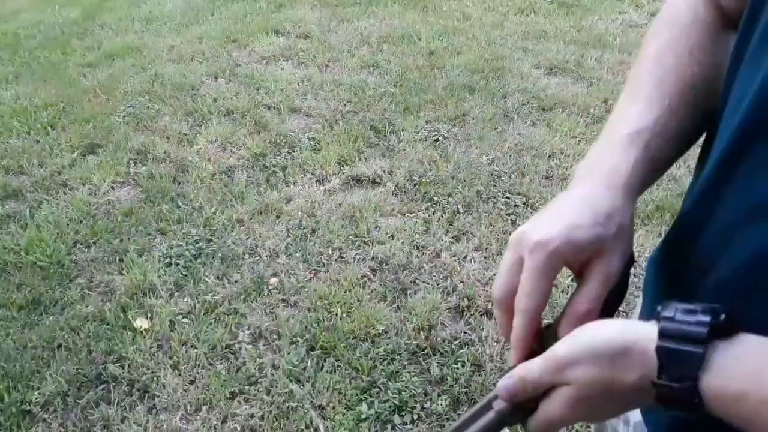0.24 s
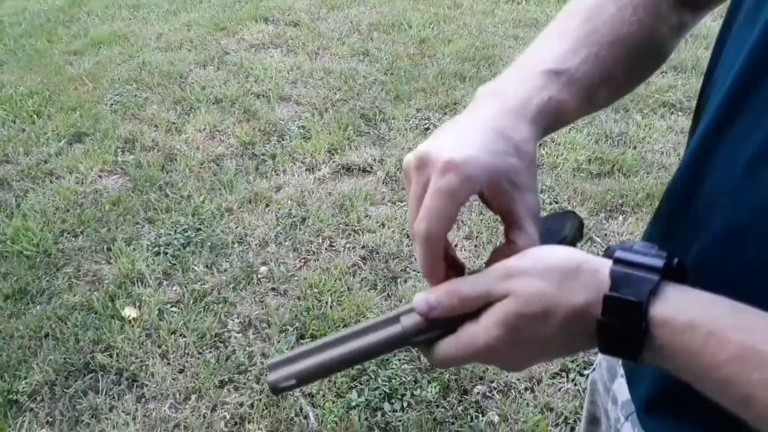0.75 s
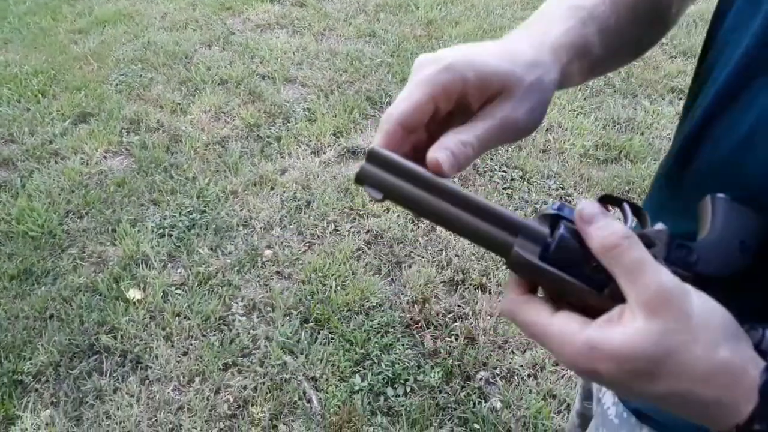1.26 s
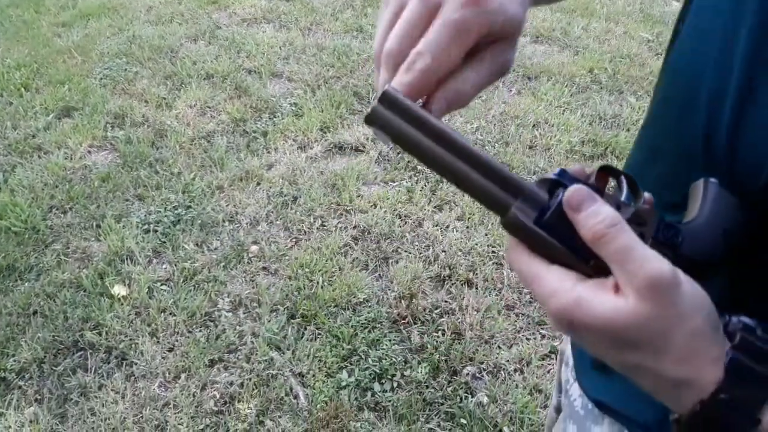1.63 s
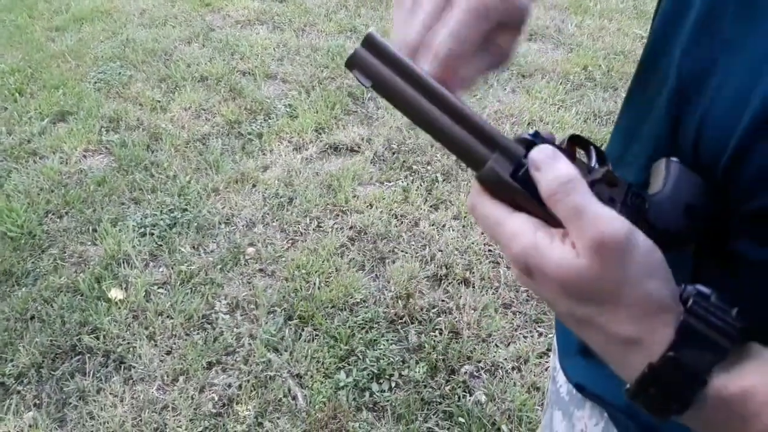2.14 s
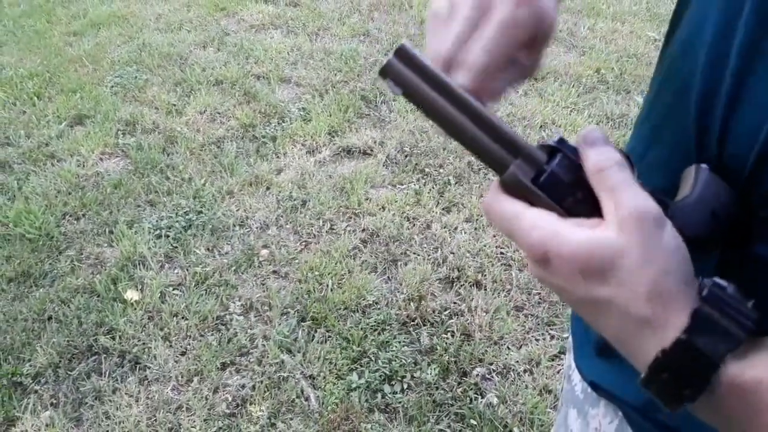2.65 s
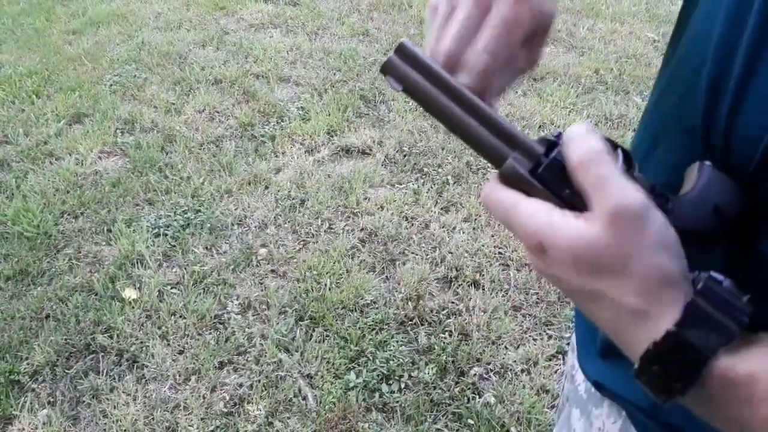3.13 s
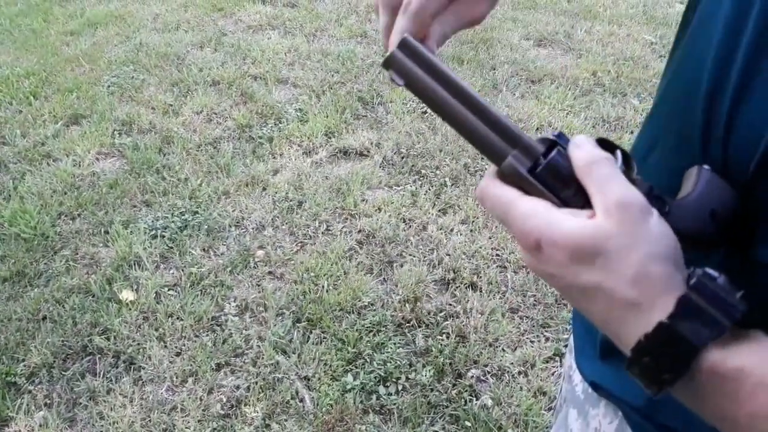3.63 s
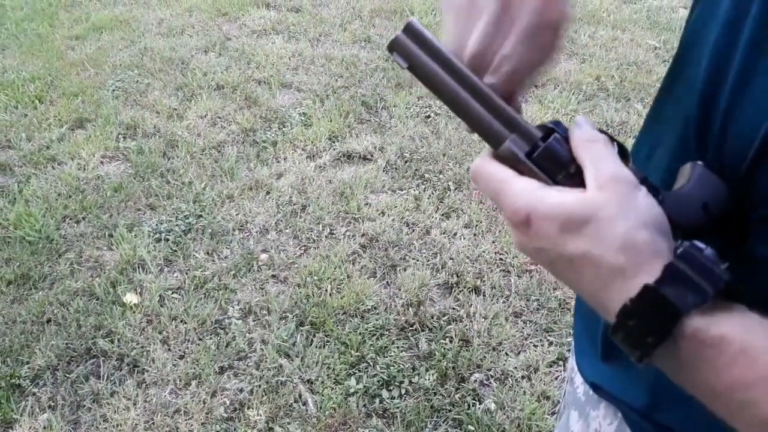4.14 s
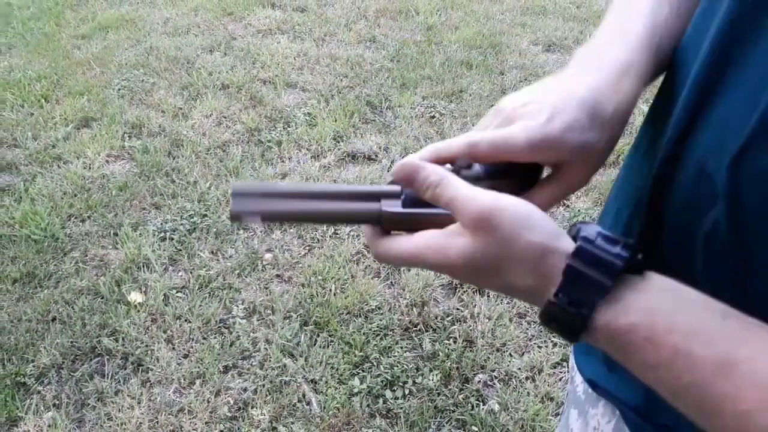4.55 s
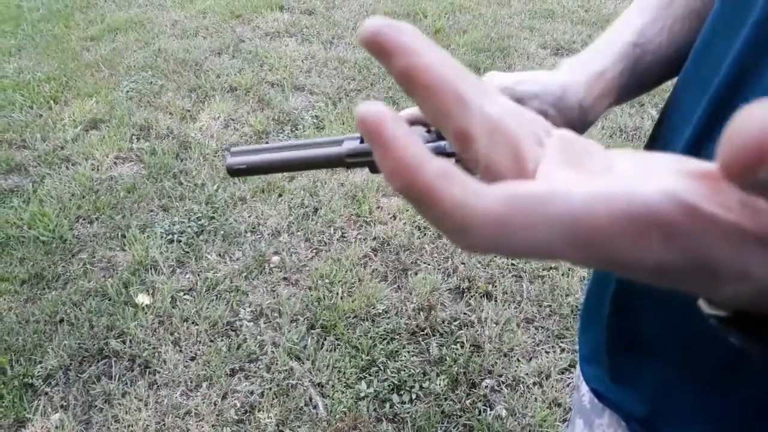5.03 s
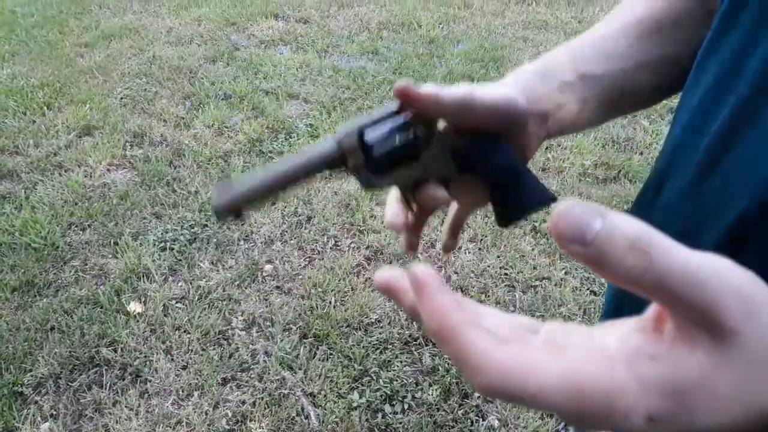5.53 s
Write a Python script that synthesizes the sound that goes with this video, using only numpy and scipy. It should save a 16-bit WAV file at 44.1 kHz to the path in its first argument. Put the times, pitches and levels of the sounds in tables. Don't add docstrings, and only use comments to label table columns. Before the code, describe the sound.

A hard metal clack, then repeated scrape-and-snap strokes of a revolver's ejector rod, ending in another loud clack on a quiet lawn.

```python
import sys
import numpy as np
from scipy import signal
from scipy.fft import rfft, irfft
from scipy.io import wavfile

SR = 44100
rng = np.random.default_rng(int(sys.argv[2]) if len(sys.argv) > 2 else 0)


def unload_wav(signal):
    wavfile.write(
        sys.argv[1],
        SR,
        np.round(np.clip(np.atleast_2d(signal).T, -1, 1) * 32767).astype(np.int16),
    )


def to_linear_factor(level_db):
    exponent = np.asarray(level_db, float) / 20
    return 10 ** exponent


N = 254935


def unit(x):
    return x / np.sqrt(np.mean(x ** 2) + 1e-20)


def at_hz(points, hz):
    points = np.array(points)
    return np.interp(np.log(np.maximum(hz, 1)), np.log(points[:, 0]), points[:, 1])


def column(rows, index):
    rows = np.array(rows)
    return np.interp(np.arange(N) / SR, rows[:, 0], rows[:, index])


def envelope(tables, index, fade_s):
    out = np.zeros(N)
    for rows in map(np.array, tables):
        start_s, end_s = rows[0, 0], rows[-1, 0]
        first = max(int((start_s - fade_s) * SR), 0)
        last = min(int((end_s + fade_s) * SR), N)
        t = np.arange(first, last) / SR
        edge = np.clip(np.minimum(t - start_s, end_s - t) / fade_s + .5, 0, 1)
        out[first:last] += edge * to_linear_factor(np.interp(t, rows[:, 0], rows[:, index]))
    return out


def drift(rate_hz):
    r = np.exp(-2 * np.pi * rate_hz / SR)
    slow = signal.lfilter([1], [1, -2 * r, r * r], rng.standard_normal(N + SR))
    return unit(slow[SR:])


def resonate(x, hz, width_hz):
    r = np.exp(-np.pi * width_hz / SR)
    zeros = np.array([1, 0, -1]) * (1 - r * r) / 2
    poles = [1, -2 * r * np.cos(2 * np.pi * hz / SR), r * r]
    return signal.lfilter(zeros, poles, x)


def body(x, modes, strengths_db=0):
    gains = to_linear_factor(np.array(modes)[:, 2] + strengths_db)
    out = 0
    for k, ((hz, width_hz, _), gain) in enumerate(zip(modes, gains)):
        out = out + (-1) ** k * gain * resonate(x, hz, width_hz)
    return out


def noise_pair(size, alike=.5):
    shared, left, right = rng.standard_normal((3, size))
    return np.sqrt(alike) * shared + np.sqrt(1 - alike) * np.array([left, right])


def coloured(spectrum, alike):
    gain = to_linear_factor(at_hz(spectrum, np.fft.rfftfreq(N, 1 / SR)))
    return unit(irfft(rfft(noise_pair(N, alike)) * gain, N))


def echoes(x, t60, start_s):
    t = np.arange(int(.6 * SR)) / SR
    tail = rng.standard_normal((2, len(t))) * to_linear_factor(-60 * t / t60) * (t > start_s)
    return signal.fftconvolve(x, tail / np.sqrt(np.sum(tail ** 2) / 2), axes=1)[:, :N]


def scatter(x, t60):
    out, r = 0, to_linear_factor(-120 / (t60 * SR))
    for band in ([600, 1800], [1800, 3200], [3200, 5500], [5500, 9000], [9000, 16000]):
        sos = signal.butter(2, band, "band", fs=SR, output="sos")
        energy = signal.lfilter([1 - r], [1, -r], signal.sosfilt(sos, x) ** 2)
        fresh = unit(signal.sosfilt(sos, rng.standard_normal((2, N))))
        out = out + np.sqrt(energy) * fresh
    return out


# t/s, leaf level/dB, breeze level/dB
AIR = [(0.0, -57.5, -74), (2.09, -59, -78), (3.99, -56.5, -74), (5.39, -64, -85), (5.78, -66.5, -78.5)]
# f/Hz, level per Hz/dB
LEAF_SPECTRUM = [(300, 5.5), (700, 14.5), (1300, 9), (2200, 11.5), (4000, 6), (7500, 1.5), (8500, -7),
                 (12000, -8), (15000, -13)]


def leaves():
    return to_linear_factor(column(AIR, index=1) - 10.5) * coloured(LEAF_SPECTRUM, alike=0.066)


# f/Hz, level per Hz/dB
BREEZE_SPECTRUM = [(25, -27.5), (50, -5), (80, -0.5), (130, -2.5), (250, -13), (500, -11), (900, -38)]
# t/s, level/dB
PUFF = [
    (.6, -72),
    (.625, -63),
    (.68, -63),
    (.72, -69),
    (.82, -71),
]


def breeze():
    gusts = to_linear_factor(np.array([2.5 * drift(9) - 1.5, 2.5 * drift(9) + 1.5]))
    turbulence = resonate(resonate(rng.standard_normal((2, N)), 150, 260), 200, 900)
    puff = envelope([PUFF], index=1, fade_s=0.016) * unit(turbulence) * to_linear_factor(2.0)
    steady = to_linear_factor(column(AIR, index=2) + 3.5) * gusts * coloured(BREEZE_SPECTRUM, alike=0.67)
    return steady + puff * np.sqrt(gusts)


STRAY_TICKS = [.234, .5766, 1.153, 1.386, 1.515, 5.2757, 5.582]
MISSED_TICKS = [1, 5, 13, 14, 15, 16, 17, 45, 47, 51, 54]


def motor():
    first_s, period_s = .0752, .10238
    beat = np.delete(np.arange(first_s, N / SR, period_s), MISSED_TICKS)
    times = np.r_[beat, STRAY_TICKS]
    tick = np.zeros(N)
    tick[(times * SR).astype(int)] = to_linear_factor(-35 - 1.2 * times + rng.normal(0, 1.5, len(times)))
    return resonate(resonate(tick + 1e-18, 6900, 1500), 6900, 1500) * to_linear_factor([[0], [-8]])


# t/s, level/dB
RUB = [
    (.106, -63),
    (.13, -46.5),
    (.15, -47.5),
    (.19, -53.5),
    (.226, -56.5),
]
# f/Hz, bandwidth/Hz, level/dB
CASE = [(510, 230, -6), (976, 122, 5), (1440, 250, -5), (2270, 400, -14), (3300, 700, -21),
        (4900, 700, -19)]


def finger_rub():
    grit = rng.standard_normal((2, N)) * to_linear_factor(1.9 * drift(120))
    rubbed = signal.sosfilt(signal.butter(4, 5500, fs=SR, output="sos"), body(grit, CASE))
    return envelope([RUB], index=1, fade_s=0.0069) * unit(rubbed) * to_linear_factor([[-1], [3]])


# t/s, tap level/dB, thud
# level/dB, thud f/Hz
BUMPS = [(0.1416, -19.5, -37.5, 70.6), (.805, -57, -50, 95), (4.348, -58, -34, 120),
         (5.112, -54, -35.5, 87), (2.083, -80, -48, 480), (2.596, -80, -48, 480), (3.896, -80, -46, 480),
         (4.82, -80, -52, 80), (5.025, -80, -52, 75), (5.186, -80, -46, 600), (5.558, -74, -59.5, 70),
         (5.597, -78, -53, 68)]


def bumps():
    out, t = np.zeros((2, N)), np.arange(4096) / SR
    for s, tap_db, thud_db, hz in BUMPS:
        tap = np.sin(2 * np.pi * 1700 * t) * np.minimum(t / .00015, 1)
        tap = tap * to_linear_factor(tap_db - 60 * t / 0.002) * to_linear_factor([[-10], [0]])
        sweep = hz * (t + hz / 15000 * (1 - np.exp(-t / .003)))
        thud = np.sin(2 * np.pi * sweep + [[0], [1.6]]) * np.minimum(t / 0.0022, 1)
        thud = thud * to_linear_factor(thud_db - 60 * t * hz / 5.2) * to_linear_factor([[-5], [2.5]])
        at = round(s * SR)
        out[:, at:at + len(t)] += tap + thud
    return out


TOUCHES = [(.8729, -43.5, 4000, 17), (1.1958, -38, 6500, 12), (1.549, -37, 3260, -10),
           (1.921, -42, 3460, 4), (4.34, -40, 4050, 18), (4.6703, -42, 3160, -13), (4.7395, -41, 3060, 2),
           (4.832, -50, 3200, -8), (4.845, -38, 3250, -12), (4.9048, -47, 3300, -6), (4.948, -55, 3300, -6),
           (4.963, -54, 3200, -6), (5.011, -47, 2600, -7), (5.0149, -46, 2610, -4), (4.754, -40, 3130, -6),
           (4.762, -38, 4600, 0), (4.984, -52, 1000, -8), (.222, -46, 2300, -10), (5.054, -56, 3300, -6),
           (5.078, -53, 3100, -6), (5.546, -47, 4600, -6), (5.5988, -55, 3980, -5), (5.61, -47, 1030, -5)]
TOUCH_COLOUR = (-16, -31, -35, .003, 4)
GATE = [
    (.9396, -6, 2750, -4, -27),
    (1.2502, -38, 3380, 14.5, -32),
    (1.723, -21.5, 3310, 0, -17),
    (4.7703, -21, 4260, -10, -20),
    (4.7875, -30, 3090, -12, -17),
    (4.79, -32, 4200, -8, -17),
    (5.1116, -7, 4300, 4, -22),
]
GATE_COLOUR = (0, -14, -12.5, .009, 1.5)
PAWL = [(1.2385, -28, 3800, 8), (4.168, -24, 1020, -8), (1.2415, -25, 4750, 6), (2.0673, -8, 2280, 6.5),
        (2.5789, -9, 2200, 4), (5.112, -10, 11400, -4), (3.0485, -14.5, 2350, 4), (3.472, -16, 2270, -4),
        (3.4716, -22, 4800, 4), (3.8759, -10, 2300, -1), (5.4264, -51.5, 2270, -4), (5.534, -47, 2224, -4),
        (5.5758, -45, 2210, 0), (5.6625, -48, 1950, 0)]
PAWL_COLOUR = (-33, -24, -16, .015, -4.5)
TICKS = [(1.6636, -49, 3400, -6), (1.6983, -42.5, 4050, -1), (2.6983, -46, 2210, -2),
         (2.2238, -46, 3910, 2), (2.4865, -39.5, 3280, 5), (2.544, -30, 4100, 0), (3.0095, -32, 4100, 2),
         (2.7154, -42.5, 4230, 6), (2.969, -41, 4100, 2), (3.3744, -41, 4020, 8.5), (3.3894, -48, 4130, 1),
         (3.5776, -51, 4300, 3), (3.5934, -52, 3860, -2), (3.9934, -43, 4100, 2), (4.15, -42, 3340, 3, 0),
         (4.4992, -49, 4600, 4.5), (4.7002, -46, 4500, -1), (5.2629, -51.5, 4300, -14),
         (4.3472, -38, 4200, 10), (4.3587, -41, 4300, 12), (3.3408, -34, 4300, 5), (3.021, -26, 3900, 2),
         (2.8472, -24, 2300, -10), (2.8565, -32, 3900, 3), (4.007, -46, 3500, 8), (4.864, -56, 4500, 6),
         (1.0745, -52, 4800, 2), (4.327, -55, 4300, 10), (5.1075, -38, 3500, 2), (4.116, -28, 4400, 2),
         (3.757, -32, 4900, 3), (4.1678, -30, 3500, -8), (3.8762, -9, 4700, -6, -18),
         (2.0427, -32, 4300, 10), (4.023, -40, 4000, 8), (5.7594, -46, 4870, -4)]
TICK_COLOUR = (-22, -12.5, -9, .006, 2.5)
SEATS = [(2.0229, -16, 4050, 2), (2.0316, -23, 3820, -10.5), (2.2594, -22, 3980, -1.5),
         (2.5098, -15, 3220, 3.5), (2.5517, -15, 3450, -3, 6), (2.5545, -17, 4100, -2),
         (2.9855, -23.5, 3300, 5, 3), (3.016, -16, 4400, -9, 4), (3.0185, -17, 4200, -6),
         (3.8087, -22, 3500, 6.5), (3.8626, -20, 3900, -5.5), (4.2683, -22, 3700, -8)]
SEAT_COLOUR = (-25, -12.5, -13, .008, 0)
SETTLE = [(2.0826, -14, 4300, -7, 5), (2.1006, -26.5, 4070, 5), (2.596, -14.5, 4070, 2.5),
          (2.608, -28, 4360, -2), (3.0685, -16.5, 4270, -20), (3.0869, -30.5, 3930, 6),
          (3.484, -27, 4500, 4), (3.4866, -18.5, 4120, 4.5), (3.4884, -19, 4400, 3),
          (3.4961, -21, 3600, -9), (3.894, -13, 4140, 1.5), (3.9011, -19, 3270, 3)]
SETTLE_COLOUR = (-25, -13.5, -6.5, .008, 0)
SNAPS = [
    (2.3342, -10.5, 4240, -3),
    (2.3397, -25.5, 4070, 8),
    (2.8466, -15.5, 4120, -1),
    (3.3246, -14.5, 3980, -3.5),
    (3.3314, -25, 3630, 0.5),
    (3.7394, -10, 4100, -2),
    (3.749, -24, 4400, -10),
    (4.1093, -13.5, 3940, -1),
    (4.406, -8.5, 4300, 1),
    (4.408, -15, 6200, 2),
]
SNAP_COLOUR = (-30, -11, -8.5, .008, 0)


def contacts():
    drags = [(s + .006, db - 8, hz, bright_db) for s, db, hz, bright_db in TOUCHES]
    kinds = [(TOUCHES, TOUCH_COLOUR), (drags, TOUCH_COLOUR), (GATE, GATE_COLOUR), (PAWL, PAWL_COLOUR),
             (TICKS, TICK_COLOUR), (SEATS, SEAT_COLOUR), (SETTLE, SETTLE_COLOUR), (SNAPS, SNAP_COLOUR)]
    out = []
    for rows, (knock_db, edge_db, treble_db, ring_s, rattle_db) in kinds:
        for s, peak_db, hz, bright_db, *own_knock in rows:
            out.append((s, peak_db, knock_db + sum(own_knock), edge_db + bright_db,
                        treble_db + bright_db, hz, ring_s, rattle_db))
    return out


# f/Hz, bandwidth/Hz, level/dB
STEEL = [(1067, 57, -19), (1565, 220, -13), (2330, 220, -3), (2870, 600, -9.5), (3500, 620, -6.5),
         (3980, 66, -9), (4300, 370, -4.5), (5100, 300, -11)]
# f/Hz, bandwidth/Hz, level/dB
STEEL_TREBLE = [(5870, 590, -16.5), (7114, 1700, -2), (9960, 1200, -4.5), (10930, 790, 0.5),
                (11450, 1800, 2.5), (13110, 710, 6.5), (14670, 1500, 1), (15800, 600, -1)]


def clicks():
    out, t = np.zeros((2, N + 2048)), np.arange(2048) / SR
    knock_band = signal.butter(3, [870, 1900], "band", fs=SR, output="sos")
    crack_band = signal.butter(2, [1800, 5500], "band", fs=SR, output="sos")
    for s, peak_db, knock_db, edge_db, treble_db, hz, ring_s, rattle_db in contacts():
        soft = 1 + max(-22 - peak_db, 0) / 10
        fall = to_linear_factor(-60 * t / (.004 * soft)) + to_linear_factor(-15 - 60 * t / .025)
        rattle = noise_pair(len(t)) * np.minimum(t / 0.00071, 1) * fall
        rattle[:, 3] += 2.2 / soft
        blow = np.sin(2 * np.pi * hz * t + rng.uniform(0, 2 * np.pi)) * np.minimum(t / 0.00026, 1)
        blow = signal.sosfilt(signal.butter(2, min(hz * .55, 1300), "high", fs=SR, output="sos"), blow)
        ring = np.ones((2, 1)) * blow * to_linear_factor(-60 * t / (ring_s * soft))
        thump = resonate(resonate(rattle, 330, 550), 330, 550)
        frame = unit(body(rattle, STEEL, rng.normal(0, 2.5, len(STEEL))))
        crack = signal.sosfilt(crack_band, rattle)
        grip = resonate(rattle, 1080 * rng.uniform(.85, 1.12), 130)
        knock = signal.sosfilt(knock_band, rattle) + .75 * grip
        edges = body(rattle, STEEL_TREBLE[:2], rng.normal(0, 3, 2))
        treble = body(rattle, STEEL_TREBLE[2:], rng.normal(0, 3, 6))
        layers = [(-11, ring), (knock_db - 17, thump), (rattle_db - 17, frame), (rattle_db - 15, crack),
                  (knock_db + 3, knock), (edge_db + 2, edges), (treble_db - 3, treble)]
        at = round(s * SR)
        for db, x in layers:
            out[:, at:at + len(t)] += to_linear_factor(peak_db + db) * x / np.abs(x).max(axis=1, keepdims=True)
    return out[:, :N] * to_linear_factor([[-2], [.2]])


def note_shape(s, length, from_hz, to_hz, db):
    share = np.arange(9) / 8
    ease = 2.8 if to_hz > from_hz else 1.8
    glide = (1 - np.exp(-ease * share)) / (1 - np.exp(-ease))
    level = db + np.interp(share, [0, .45, 1], [-3.5, 0, -7])
    return np.c_[s + length * share, from_hz + (to_hz - from_hz) * glide, level]


# t/s, length/s, start f/Hz, end f/Hz, level/dB
NOTES = [(.229, .018, 3460, 4020, -53), (.246, .014, 3900, 2950, -58), (.26, .028, 2900, 2700, -58),
         (.318, .025, 2600, 3160, -53), (.338, .05, 3170, 2930, -44.5), (.385, .026, 2950, 2550, -55),
         (1.142, .015, 4100, 3500, -56), (1.344, .04, 2810, 2530, -62), (1.438, 0.05, 2300, 3680, -52),
         (1.482, .013, 4080, 4130, -57), (1.495, 0.025, 3290, 2600, -59), (1.53, .055, 3560, 3620, -67),
         (1.61, .05, 3450, 3650, -73), (1.468, .016, 4700, 4200, -64), (1.49, .02, 3600, 3400, -60),
         (2.385, .04, 3150, 2980, -59), (2.41, .05, 3350, 3520, -59), (3.542, .045, 2500, 3500, -60),
         (3.51, .03, 3100, 2900, -64), (4.588, 0.04, 2610, 2540, -71), (4.622, .028, 2600, 3300, -64),
         (4.645, .016, 3300, 3400, -53), (5.675, 0.043, 2900, 4120, -68), (5.718, 0.041, 4100, 2950, -67)]


def bird():
    song, warble = 0, 1 + .008 * drift(90)
    for note in NOTES:
        rows = note_shape(*note)
        phase = 2 * np.pi * np.cumsum(column(rows, index=1) * warble) / SR
        song = song + envelope([rows], index=2, fade_s=.012) * np.sin(phase)
    song = song * to_linear_factor([[-4], [-10]])
    return song + to_linear_factor(-1.5) * echoes(song, t60=.45, start_s=0.013)


# t/s, length/s, level/dB
RUSTLES = [
    (.27, .08, -78),
    (.69, .06, -82),
    (1.07, .05, -78),
    (1.57, .1, -79),
]


def sleeve():
    shapes = [[(s, db), (s + length, db)] for s, length, db in RUSTLES]
    hiss = unit(resonate(rng.standard_normal((2, N)), 12500, 3500))
    return envelope(shapes, index=1, fade_s=.04) * hiss


# f/Hz, level/dB, t60/s
GATE_MODES = [(1480, 5, .012), (2720, -20, .04), (4100, 2, .022), (4590, -6, .06), (5884, -22, .15),
              (5300, 4, .022), (6918, -12, .06), (7780, -26, .06), (11320, -26, .08), (12800, -30, .1),
              (14550, -30, .1)]
# f/Hz, level/dB, t60/s
PIN_MODES = [(2300, -8, .06), (4700, -2, .05), (5055, -22, .2), (6270, -10, .03), (6890, -7, .04),
             (7500, -5, .03), (13060, -24, .06)]
# f/Hz, level/dB, t60/s
SHUT_MODES = [(1150, -4, .035), (2300, 3, .035), (3100, -8, .06), (4200, -12, .08), (5200, -8, .07),
              (6120, -14, .16), (6930, -4, .06), (7510, -15, .18), (9250, -12, .11), (10400, -13, .16),
              (11650, -14, .17), (12830, -18, .14), (13900, -17, .19), (15200, -20, .1)]


def rings():
    # t/s, level/dB, bandwidth of the shaken modes/Hz, share of clear tone, modes
    blows = [(.9396, -30, 350, .1, GATE_MODES), (1.2385, -36, 120, 1.1, PIN_MODES),
             (5.112, -29, 450, .1, SHUT_MODES)]
    out, t = np.zeros((2, N)), np.arange(12000) / SR
    for s, level_db, width_hz, clear, modes in blows:
        at = round(s * SR)
        for hz, db, t60 in modes:
            tone = clear * np.sin(2 * np.pi * (hz * t + rng.random()))
            shaken = resonate(resonate(noise_pair(len(t) + 2000), hz, width_hz), hz, 2 * width_hz)
            shaken = unit(shaken[:, 2000:])
            decay = to_linear_factor(level_db + db - 60 * t / t60) * np.minimum(t / .0006, 1)
            out[:, at:at + len(t)] += decay * (tone + .55 * shaken)
    return out


# t/s, length/s, f/Hz, level/dB
SQUEALS = [(2.237, .07, 3980, -47), (2.298, .02, 3100, -47), (2.255, .03, 2200, -54),
           (2.745, .095, 3900, -55), (2.755, .02, 3050, -53), (2.81, .035, 3250, -49),
           (2.75, .05, 2450, -57), (2.965, .03, 4150, -53), (3.02, .03, 3100, -50),
           (3.222, .022, 4100, -52), (3.243, .04, 4325, -42), (3.282, .018, 3100, -47),
           (3.303, .014, 3100, -50), (3.215, .025, 2300, -56), (3.4, .058, 4200, -51),
           (3.412, .05, 3300, -51), (3.64, .045, 4250, -50), (3.68, .056, 4050, -48),
           (3.692, .042, 3200, -51), (3.652, .03, 2400, -56), (3.822, .035, 4200, -49),
           (4.04, .035, 4150, -46), (4.065, .03, 3950, -49), (4.062, .04, 3150, -49),
           (4.195, .05, 4300, -52), (4.362, .02, 4150, -50), (4.378, .024, 4400, -47),
           (4.735, .014, 3080, -56), (4.75, .016, 3130, -57), (4.775, .06, 3150, -65),
           (4.68, .018, 2820, -65), (3.503, .04, 1300, -62), (3.2, .025, 4200, -58),
           (3.615, .03, 4100, -60), (4.4, .035, 3900, -57), (1.184, .01, 3700, -64),
           (1.697, .022, 4100, -60), (4.168, .022, 1020, -52), (2.03, .015, 1400, -52)]


def squeals():
    out, width_hz = np.zeros((2, N)), 160
    for s, length, hz, db in SQUEALS:
        caught = resonate(resonate(noise_pair(8192), hz, width_hz), hz, width_hz * 2)
        tone = unit(caught[:, 2048:])
        share = np.clip(np.arange(6144) / SR / length, 0, 1)
        swell = np.sqrt(np.sin(np.pi * share).clip(0))
        at = round(s * SR)
        out[:, at:at + 6144] += to_linear_factor(db - 2.5) * swell * tone
    return out


def stroke_shape(s, length, db, swell_db, bright_db):
    gather_s, stop_s = 0.022, 0.017
    times = s + np.array([0, min(gather_s, length / 2), max(length - stop_s, length / 2 + 1e-4), length])
    swing = np.array([-14.5 - swell_db / 2, -swell_db / 2, swell_db / 2, -5.5 + swell_db / 2])
    return np.c_[times, db + swing, db + bright_db + 1.52 * swing]


# t/s, length/s, level/dB, swell from start to end/dB, brightness/dB
STROKES = [(1.693, 0.05, -54.5, -1.5, 5.5), (2.023, .067, -39, 4, 6), (2.23, 0.12, -39.5, 0.5, 4.5),
           (2.479, 0.041, -47.5, 8, 0.5), (2.539, 0.074, -41, -4.5, 7), (2.734, 0.12, -43, -2, 4.5),
           (2.966, .022, -42, 6, -4), (3.005, 0.076, -41, -0.5, 6.5), (3.199, 0.15, -44, 8, 1),
           (3.399, 0.1, -41.5, 7.5, 5), (3.626, 0.13, -44, 7, 2), (3.808, 0.0996, -41, 0, 4),
           (4.007, 0.11, -41, -3, 3.5), (4.161, 0.11, -42.5, 7.5, 2.5), (4.353, 0.085, -38, -5, 1),
           (4.735, 0.067, -55, 2, -22), (5.585, 0.073, -63.5, -9, -8.5)]
# f/Hz, bandwidth/Hz, level/dB
ROD = [(2270, 200, -18), (3100, 170, -7), (3500, 200, -10), (3980, 130, 0), (4310, 70, -2), (4800, 500, -9)]


def strokes():
    catches_per_s, catch_spread_db = 7000, 3.5
    hardness_db = catch_spread_db * np.minimum(rng.exponential(size=N), 4)
    catches = (rng.random(N) < catches_per_s / SR) * noise_pair(N) * to_linear_factor(1.8 * drift(250) + hardness_db)

    turns = [to_linear_factor(db + 3.5 * drift(15)) for _, _, db in ROD]
    low = sum(gain * unit(resonate(catches, hz, width)) for gain, (hz, width, _) in zip(turns, ROD))
    low = low / np.sqrt(sum(gain ** 2 for gain in turns))
    low = low + to_linear_factor(-22) * unit(resonate(catches, 3000, 3000)) + to_linear_factor(-19) * unit(resonate(catches, 950, 500))

    high = 0
    for k, (hz, width, db) in enumerate(STEEL_TREBLE):
        high = high + (-1) ** k * to_linear_factor(db + 2.5 * drift(18)) * resonate(catches, hz, width)
    high = unit(signal.sosfilt(signal.butter(2, 4800, "high", fs=SR, output="sos"), high))
    high = high + to_linear_factor(-16) * unit(resonate(catches, 15280, 160))

    shapes = [stroke_shape(*row) for row in STROKES]
    low_gain = to_linear_factor(-9.5) * envelope(shapes, index=1, fade_s=0.0052)
    high_gain = to_linear_factor(-5.5) * envelope(shapes, index=2, fade_s=0.0044)
    return low_gain * low + high_gain * high


def scene():
    gun = clicks() + rings() + squeals() + strokes()
    gun[0] = np.roll(gun[0], 5)
    near = to_linear_factor(-17) * echoes(gun, t60=.04, start_s=.002)
    revolver = gun + near + to_linear_factor(-20) * scatter(gun, t60=0.2)
    camera = motor() + finger_rub() + bumps()
    return leaves() + breeze() + camera + revolver + bird() + sleeve()


# f/Hz, level/dB
LEFT_PORT = [(350, 4.5), (1000, 4.5), (1700, 3.5), (2400, 6), (3100, 5), (4500, 2.5), (5800, 9.5),
             (7200, 9.5), (8200, 3), (10700, 8.5), (12400, 14), (14000, 8), (15400, 16), (16300, -31)]
# f/Hz, level/dB
RIGHT_PORT = [(350, 1), (1000, 2.5), (1700, 7.5), (2300, 13), (3500, 15.5), (4300, 15.5), (5200, 9),
              (7200, -9.5), (8000, -5), (9300, -2), (10700, 7), (13500, -19), (14900, 3.5), (16200, -39)]


def ports(dry):
    hz, out = np.linspace(0, SR / 2, 513), []
    for x, port in zip(dry, (LEFT_PORT, RIGHT_PORT)):
        cepstrum = irfft(np.log(to_linear_factor(at_hz(port, hz))))
        cepstrum[1:512] *= 2
        cepstrum[513:] = 0
        out.append(signal.fftconvolve(x, irfft(np.exp(rfft(cepstrum))))[:N])
    return np.array(out)


def band_limit(x):
    return signal.sosfilt(signal.butter(12, 16780, fs=SR, output="sos"), x)


def record(dry):
    mix = 1.372 * np.tanh(ports(dry) / 1.312)
    return band_limit(mix)


dry = scene()
out = record(dry)
unload_wav(out)
```